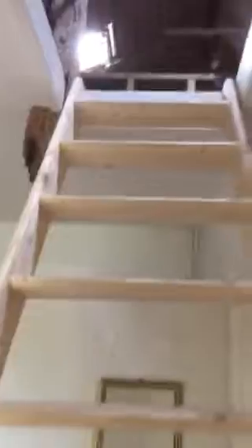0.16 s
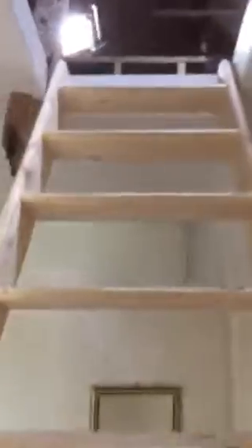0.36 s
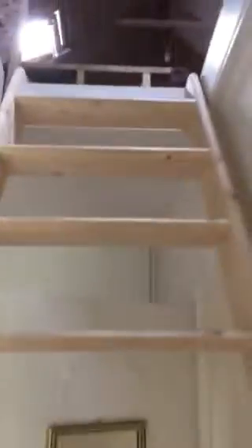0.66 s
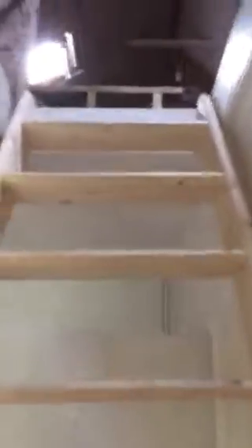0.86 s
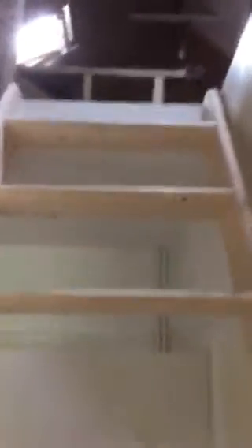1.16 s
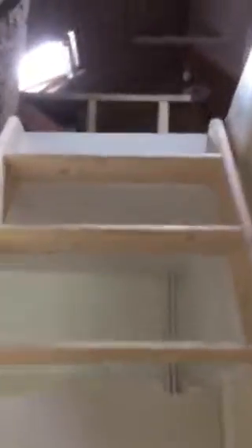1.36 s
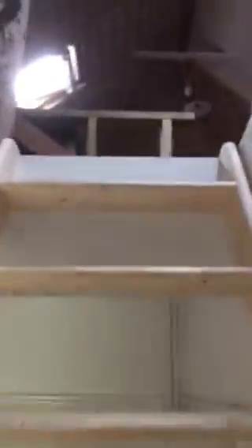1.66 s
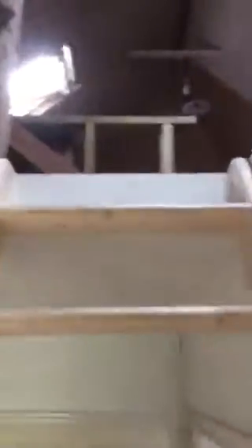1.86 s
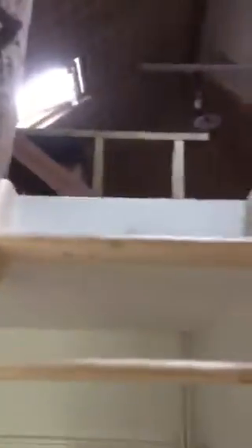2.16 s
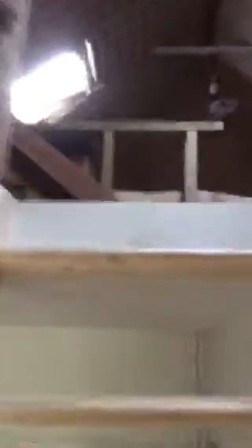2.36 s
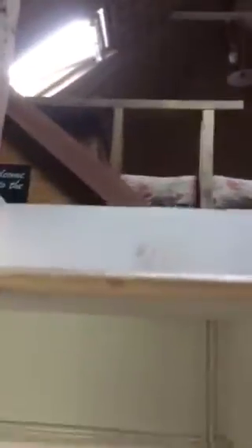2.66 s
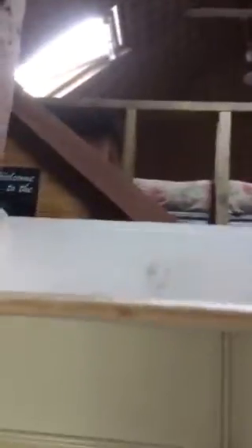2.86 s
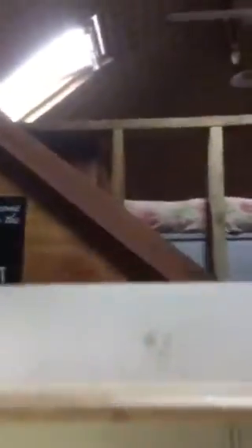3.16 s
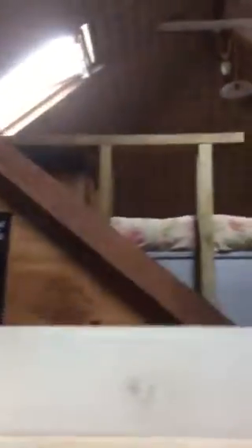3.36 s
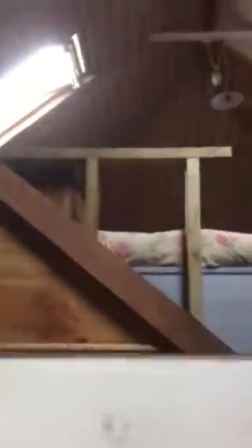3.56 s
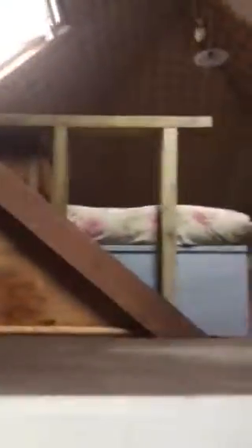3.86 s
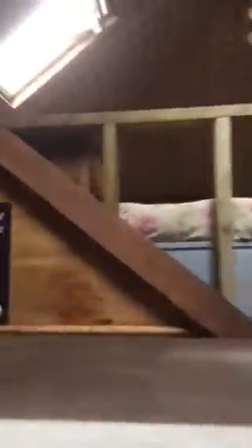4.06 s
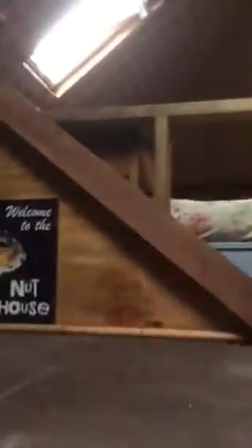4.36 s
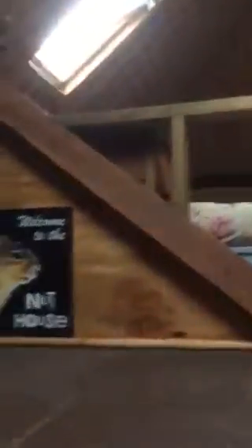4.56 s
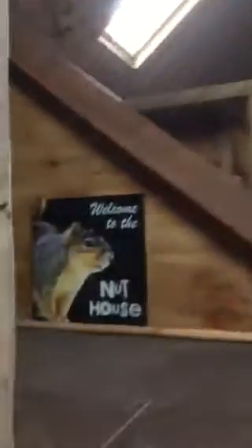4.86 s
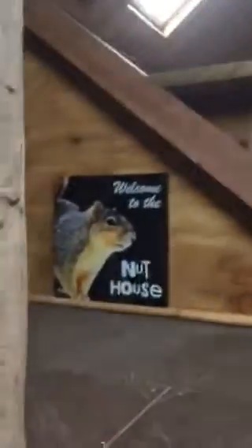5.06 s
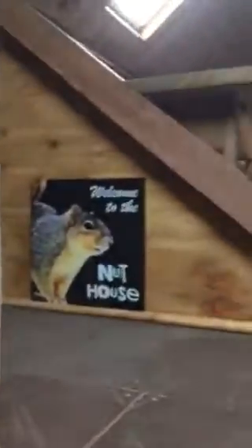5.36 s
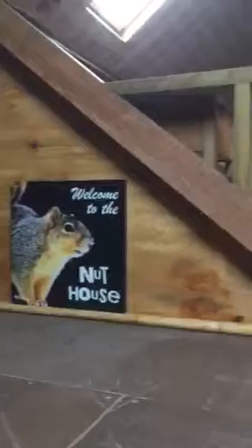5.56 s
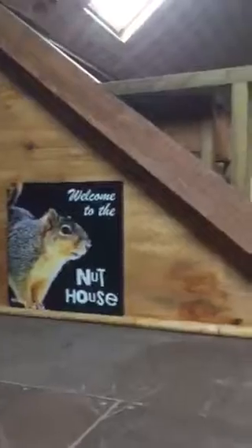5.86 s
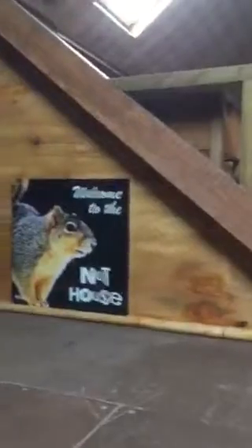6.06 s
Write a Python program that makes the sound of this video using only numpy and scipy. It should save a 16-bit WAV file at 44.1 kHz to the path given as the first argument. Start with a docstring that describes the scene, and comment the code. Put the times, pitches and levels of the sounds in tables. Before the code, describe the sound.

In a small, bare, quiet room, one person climbs a steep wooden stair, a footfall about every three quarters of a second. Each lands with a low hollow thump, woody knock and soft slap, then a faint scuff as the other foot leaves. Sharp cracks cluster before the last steps onto attic boards, which are gentler. Cloth brushes and tiny squeaks fill the gaps. Single mono microphone, short room reverberation.

```python
"""Ladder-stair to the attic

Someone climbs a steep wooden ladder-stair onto attic boards in a small, bare, quiet room.
Footfalls graze, thump the frame (decaying low modes), knock the boards and slap (filtered noise bursts).
Wood cracks and landing feet tick (sharp noise bursts); push-offs thud and scuff, cloth brushes, grips squeak.
One mono microphone hears it all; distance is heard only as each sound's balance of direct and room."""
import sys
import numpy as np
from scipy import signal
from scipy.fft import rfft, irfft, next_fast_len
from scipy.io import wavfile
from scipy.ndimage import uniform_filter1d

SR = 44100
rng = np.random.default_rng(int(sys.argv[2]) if len(sys.argv) > 2 else 0)


def log_audio(samples):
    """Write samples as a 16-bit WAV file to the path given in sys.argv[1]."""
    # one column per channel
    frames = np.atleast_2d(samples).T
    # limit to full scale, then quantise
    limited = np.clip(frames, -1, 1)
    pcm = np.round(limited * 32767).astype(np.int16)
    wavfile.write(sys.argv[1], SR, pcm)


N = 273420
T = np.arange(3 * 2 ** 13) / SR  # the life of one sound [s]
HZ = np.fft.rfftfreq(len(T), 1 / SR) + 1e-3  # kept off zero so that ratios and logs exist

# Event levels are the rms of the loudest short stretch; a swell's half length is its bell's standard deviation.
# Steady room tone: (frequency [Hz], relative density [dB per Hz])
AIR = [(15, -63), (25, -16), (92, -3), (180, -3.5), (236, -8), (363, -11.5), (659, -17), (775, -17),
       (1230, -16.5), (1480, -19.5), (2110, -19.5), (13600, -30), (16000, -34.5)]
# Reverberation: (frequency [Hz], time to fall 60 dB [s])
ROOM = [(100, 0.47), (300, 0.43), (1000, 0.34), (3000, 0.32), (7000, 0.24), (15000, 0.43)]
# Footfalls: (time [s], thump level [dB], thump centre [Hz], ring length [factor], floor boom level [dB],
# knock level [dB], slap level [dB], slap upper edge [Hz])
STEPS = [(0.024, -26, 224, 0.81, -53, -32, -42, 5060), (0.798, -39, 244, 1.46, -45, -43, -52, 3430),
         (1.548, -38, 160, 1.87, -42, -45.5, -45.5, 2750), (2.232, -39, 314, 0.5, -52, -44, -44.5, 3720),
         (2.254, -26, 110, 1.02, -53, -39, -41, 2970), (2.921, -33.5, 179, 1.32, -45, -39.5, -45.5, 2580),
         (3.593, -30.5, 190, 1.8, -66, -37.5, -40.5, 3140),
         (4.371, -34, 282, 0.58, -44.5, -44, -48.5, 3250), (5.122, -45, 218, 1.2, -51.5, -53, -60, 2230)]
# Sharp cracks of wood, and bright ticks of the feet as they land: (time [s], level [dB], centre [Hz])
SNAPS = [(0.022, -52.5, 4600), (0.311, -59, 2840), (0.804, -52.5, 3400), (0.854, -55.5, 5650),
         (0.902, -48, 3920), (0.9435, -56, 2230), (1.549, -53.5, 5500), (2.252, -39.5, 4140),
         (2.33, -61.5, 9000), (2.922, -59, 6500), (2.972, -50, 3000), (3.679, -56.5, 4070),
         (3.8092, -41.5, 2440), (3.838, -47, 3100), (3.879, -40.5, 2520), (5.987, -48, 3730),
         (6.008, -69, 2230)]
# Low modes of the stair frame and the floor that carries it:
# (frequency [Hz], relative level [dB], time to fall 60 dB before the ring factor [s])
FRAME = [(45.9, -12, 0.92), (62.2, -3.5, 0.64), (85.5, -4, 0.44), (120.9, 0.5, 0.3), (148.4, -2.5, 0.36),
         (173.1, -7, 0.31), (201.9, 1.5, 0.21), (249, -3, 0.3), (268.9, 0, 0.17), (304, 1.5, 0.11),
         (351.3, -10, 0.27)]
# Resonances of a single board: (frequency [Hz], width [Hz], relative level [dB])
BOARD = [(414, 55, 7.5), (596.7, 44, -1.5), (663, 10, 0.5), (828, 51, -4), (917, 26, 1), (1110, 100, -1),
         (1275, 130, -4.5), (1340, 34, -19.5), (1842, 330, -3.5), (2088, 27, -1.5), (2456, 170, -1),
         (3150, 41, -6), (3630, 23, -4), (4160, 17, -36)]
# Push-offs of the trailing foot:
# (time [s], thud level [dB], knock level [dB], scuff level [dB], scuff centre [Hz])
PUSH_OFFS = [(.368, -54, -68, -59.5, 1010), (.945, -51, -45, -72, 2370), (1.07, -57, -67.5, -60, 3520),
             (1.808, -49, -70, -58, 1610), (2.445, -60.5, -66.5, -59.5, 3040),
             (3.113, -54, -65, -64.5, 3300), (4.522, -55.5, -65, -69, 2070), (5.264, -61, -74, -100, 1520),
             (5.918, -59.5, -71, -71, 1620)]
# Broad brushes over wood: mostly cloth as a leg swings, and at 1.663 s a sole sliding on its tread: (time of
# peak [s], half length [s], level [dB])
SWINGS = [(1.189, 0.018, -57), (1.293, 0.058, -64.5), (1.663, .029, -59), (2.6, 0.033, -55.5),
          (2.881, 0.041, -67.5), (4.099, .035, -55.5), (5.986, 0.015, -57.5)]
# Rubbing squeaks: (time of peak [s], half length [s], level [dB], pitch at peak [Hz], glide [octaves/s])
SQUEAKS = [(1.269, .0045, -60, 2900, -5.5), (1.371, .008, -65.5, 2414, -2), (2.71, .011, -58, 2540, 2),
           (3.102, 0.028, -60.5, 1777, 1.5), (4.196, 0.012, -61, 1243, -8.5), (4.72, 0.031, -78, 1454, 0),
           (4.98, .095, -81, 1247, .5)]
# Resonances of an attic floor panel: (frequency [Hz], width [Hz], relative level [dB])
PANEL = [(496, 110, 6.5), (834, 90, -14), (990, 100, 0), (1310, 110, -0.5), (1730, 85, -25), (2840, 250, 4),
         (3340, 130, 5.5)]


def amp(db):
    """Decibels to gain."""
    return 10 ** (np.asarray(db) / 20)


def along(points, hz):
    """(Hz, value) points read on a log frequency axis."""
    f, v = np.transpose(points)
    return np.interp(np.log(hz + 1), np.log(f), v)


def room_tone():
    """Faint steady rumble and hiss: noise with the spectrum of the still room."""
    level_db = -70
    spectrum = rfft(rng.standard_normal(N))
    colour = amp(along(AIR, np.fft.rfftfreq(N, 1 / SR)))
    air = irfft(spectrum * colour, N)
    return amp(level_db) * air / np.std(air)


def loudest(x, size):
    """Scale x to rms 1 over its loudest stretch of size samples."""
    power = uniform_filter1d(x * x, size, mode="constant")
    return x / np.sqrt(np.max(power))


def add(track, s, x):
    """Mix x into the track from time s."""
    start = max(round(s * SR), 0)
    track[start:start + len(x)] += x[:N - start]


def band(low_hz, high_hz, fall=5.1):
    """Gain of a pass band with soft edges; fall sets the steepness of the upper one."""
    below = 1 + (low_hz / HZ) ** 6
    above = 1 + (HZ / high_hz) ** (2 * fall)
    return 1 / np.sqrt(below * above)


def favour(hz, centre_hz, octaves):
    """The place of a blow brings out the resonances around one pitch."""
    return 1 / np.sqrt(1 + (2 * np.log2(hz / centre_hz) / octaves) ** 2)


def resonances(modes):
    """Power gain of a wooden part, summed over its resonant peaks."""
    return sum(amp(db) ** 2 / (1 + ((HZ ** 2 - hz ** 2) / (HZ * width)) ** 2) for hz, width, db in modes)


def board(between_db):
    """Gain of a board's resonances, over the many weak modes between them."""
    return np.sqrt(resonances(BOARD) + amp(between_db) ** 2)


def coloured(x, gain):
    """Causal (minimum-phase) filter with the given gain, so that nothing sounds before a blow."""
    cepstrum = irfft(np.log(np.maximum(gain, 1e-5)))
    # fold the cepstrum onto positive time
    cepstrum[1:] *= 2 * (np.arange(1, len(T)) < len(T) // 2)
    response = irfft(np.exp(rfft(cepstrum)))
    return signal.fftconvolve(x, response)[:len(T)]


def room_tail():
    """The room's diffuse answer, drawn anew for each sound; it dies soonest around 7 kHz."""
    hz, t, z = signal.stft(rng.standard_normal(len(T)), SR, nperseg=256)
    decay = amp(-60 * t / along(ROOM, hz)[:, None])
    tail = signal.istft(z * decay, SR, nperseg=256)[1]
    return tail[:len(T)] / np.linalg.norm(tail)


def in_room(x, wet_db):
    """A sound together with its reverberation."""
    return x + amp(wet_db) * signal.fftconvolve(x, room_tail())[:len(T)]


def burst(t60, rise, wet_db):
    """The brief rough contact of two surfaces, and the reflections that build up after it."""
    contact = rng.standard_normal(len(T)) * amp(-60 * T / t60) * (1 - np.exp(-T / rise))
    reflections = room_tail() * (1 - np.exp(-T / 0.00055))
    return contact / np.linalg.norm(contact) + amp(wet_db) * reflections


def swell(half):
    """A bell-shaped rise and fall that peaks three half lengths after its start."""
    return np.exp(-.5 * (T / half - 3) ** 2)


def stroke(half, gain):
    """Grainy friction that swells and fades."""
    grip_db = 4.5 * np.interp(T, T[::200], rng.standard_normal(len(T[::200])))
    rub = rng.standard_normal(len(T)) * amp(grip_db) * swell(half)
    return loudest(in_room(coloured(rub, gain), wet_db=-1.5), size=1024)


def brush(s, half, db, low_hz, high_hz):
    """A track with one stroke of sole or cloth over wood, peaking at time s."""
    track = np.zeros(N)
    colour = board(between_db=1) * band(low_hz, high_hz, fall=2.06) / np.sqrt(1 + HZ / 2000)
    add(track, s - 3 * half, amp(db) * stroke(half, colour))
    return track


def footsteps():
    """Each foot grazes and lands with thump, boom, knock and slap; then it rolls onto its ball
    and, on a tread, slides."""
    attic_from_s = 4
    # time for the weight to come on; a duller landing is slower
    load_s, load_at_hz, load_power = 0.0071, 3040, 1.9
    # the sole grazes as it lands, its level taken over the slap
    touch_half_s, touch_db, touch_low_hz, touch_high_hz = .005, -11.5, 329, 3600
    stair_knock_hz = 812  # where a tread rings most
    # after the heel, the foot rolls onto its ball; every tread takes the same body weight
    roll_s, roll_db, roll_hz, roll_rise_s, roll_knock_db = .046, -40, 132.6, 0.009, -54.5
    level_roll_db = -7.5  # on the level floor the roll is gentle: dB over the thump
    # the sole slides a little on the tread; a heavier landing slides louder
    slide_after_s, slide_half_s, slide_low_hz, slide_high_hz = 0.03, 0.019, 5200, 8000
    slide_at_db, slide_at_thump_db, slide_db_per_db = -62.5, -29, .5

    out = np.zeros(N)
    for s, db, centre_hz, ring, boom_db, knock_db, slap_db, edge_hz in STEPS:
        rise = load_s * (load_at_hz / edge_hz) ** load_power
        out += brush(s, touch_half_s, slap_db + touch_db, touch_low_hz, touch_high_hz)
        add(out, s, amp(db) * thump(centre_hz, rise, ring))
        add(out, s, amp(boom_db) * boom())
        add(out, s, amp(slap_db) * slap(edge_hz))
        if s < attic_from_s:
            add(out, s, amp(knock_db) * knock(stair_knock_hz))
            add(out, s + roll_s, settle(roll_db, roll_hz, roll_rise_s, roll_knock_db, stair_knock_hz))
            slide_db = slide_at_db + slide_db_per_db * (db - slide_at_thump_db)
            out += brush(s + slide_after_s, slide_half_s, slide_db, slide_low_hz, slide_high_hz)
        else:
            add(out, s, amp(knock_db) * panel(edge_hz))
            add(out, s + roll_s, amp(db + level_roll_db) * thump(roll_hz, roll_rise_s, ring=0.63))
    return out


def cracks_and_ticks():
    """Sharp cracks of wood, and bright ticks of the feet as they land; lower snaps shake the wood more."""
    spread = 2.82  # band edges as a factor either side of the centre
    top_hz = 13800  # the top of the snaps is softened on the way to the microphone
    # room share of a snap at the reference level; it hardly varies, fainter ones being a touch drier
    room_db, snap_at_db, room_db_per_faint_db = -2.5, -43.5, -0.01
    # a low snap shakes board and frame too; a high one does so less
    shake_at_hz, shake_db_per_octave = 2540, -9
    shake_knock_db, shake_knock_hz, shake_thump_db, shake_thump_hz = -4, 1126, -6, 226

    out = np.zeros(N)
    wood = board(between_db=-7.0) * band(300, top_hz, fall=5.4) / np.sqrt(1 + HZ / 1500)
    for s, db, centre_hz in SNAPS:
        wet_db = room_db + room_db_per_faint_db * (snap_at_db - db)
        noise = burst(t60=0.024, rise=0.0019, wet_db=wet_db)
        snap = coloured(noise, wood * band(centre_hz / spread, centre_hz * spread, fall=2.45))
        shake_db = db + shake_db_per_octave * np.log2(centre_hz / shake_at_hz)
        shake = settle(shake_db + shake_thump_db, shake_thump_hz, 0.0036,
                       shake_db + shake_knock_db, shake_knock_hz)
        add(out, s, amp(db) * loudest(snap, size=1024) + shake)
    return out


def thump(centre_hz, rise, ring):
    """Weight comes on and bends the frame, which rings in its low modes."""
    hz, db, t60 = np.transpose(FRAME)[:, :, None]
    strength, detune = rng.standard_normal((2, len(FRAME), 1))
    sizes = favour(hz, centre_hz, octaves=0.6) * amp(db + 2.6 * strength)
    cycles = hz * (1 + 0.0088 * detune) * T + rng.random((len(FRAME), 1))
    decay = np.exp(-np.log(1000) * T / (t60 * ring))
    modes = sizes * np.sin(2 * np.pi * cycles) * decay
    loaded = modes.sum(0) * (1 - np.exp(-T / rise))
    return loudest(in_room(loaded, wet_db=-6.5), size=2048)


def knock(centre_hz):
    """A blow rings the board's short, woody resonances; the low ones belong to the frame."""
    gain = board(between_db=-6) * favour(HZ, centre_hz, octaves=0.47) * band(low_hz=336, high_hz=1630)
    blow = coloured(burst(t60=0.026, rise=0.00074, wet_db=-17.5), gain)
    return loudest(in_room(blow, wet_db=2.0), size=1024)


def settle(thud_db, centre_hz, rise, knock_db, knock_hz):
    """A shift of weight: a short thud of the frame and a knock of the board."""
    return amp(thud_db) * thump(centre_hz, rise, ring=0.83) + amp(knock_db) * knock(knock_hz)


def boom():
    """The heavy floor follows slowly with a dull, deep swing."""
    push = burst(t60=0.2, rise=0.016, wet_db=-2)
    return loudest(coloured(push, band(74, 78.6, fall=3.5)), size=2048)


def slap(edge_hz):
    """The sole meets the surface; a duller landing sounds in a lower band."""
    gain = board(between_db=-1) * band(0.36 * edge_hz, edge_hz, fall=5.45)
    return loudest(coloured(burst(t60=0.048, rise=0.00038, wet_db=7.0), gain), size=1024)


def push_offs():
    """The trailing foot unloads its board and scuffs it as it leaves."""
    thud_hz, rise_s, knock_hz = 185.5, 0.0064, 960
    scuff_after_s, scuff_half_s = .014, 0.031
    spread = 2.84  # band edges as a factor either side of the centre
    out = np.zeros(N)
    for s, thud_db, knock_db, scuff_db, scuff_hz in PUSH_OFFS:
        add(out, s, settle(thud_db, thud_hz, rise_s, knock_db, knock_hz))
        out += brush(s + scuff_after_s, scuff_half_s, scuff_db, scuff_hz / spread, scuff_hz * spread)
    return out


def leg_swings():
    """Broad brushing of cloth as a leg swings, and once of a sole sliding on its tread."""
    return sum(brush(s, half, db, low_hz=1300, high_hz=4670) for s, half, db in SWINGS)


def squeaks():
    """Narrow squeaks where a surface grips; louder and higher ones are rougher."""
    # relative pitch jitter of a squeak at the reference level and pitch
    jitter_at, jitter_at_db, jitter_at_hz = 0.134, -61, 2000
    out = np.zeros(N)
    for s, half, db, hz, glide in SQUEAKS:
        jitter = jitter_at * amp(db - jitter_at_db) * (hz / jitter_at_hz) ** 2.15
        add(out, s - 3 * half, amp(db) * squeak(half, hz, glide, jitter))
    return out


def squeak(half, hz, glide, jitter):
    """Stick and slip at an unsteady, gliding rate."""
    waver = np.interp(T, T[::24], rng.standard_normal(len(T[::24])))
    pitch = hz * 2 ** (glide * (T - 3 * half)) * (1 + jitter * waver)
    tone = swell(half) * np.sin(2 * np.pi * np.cumsum(pitch) / SR)
    return loudest(in_room(tone, wet_db=-4.5), size=1024)


def panel(edge_hz):
    """A foot rings a thin floor panel; a duller landing brings out its lower resonances."""
    centre_hz = 0.39 * edge_hz  # rings most at this share of the slap edge
    gain = np.sqrt(resonances(PANEL)) * favour(HZ, centre_hz, octaves=0.46)
    gain = gain * band(low_hz=377, high_hz=edge_hz, fall=5.7)
    blow = coloured(burst(t60=0.092, rise=0.0021, wet_db=-9), gain)
    return loudest(in_room(blow, wet_db=-6.5), size=1024)


def scene():
    """Everything as it reaches the one microphone."""
    mix = room_tone() + footsteps() + cracks_and_ticks() + push_offs() + leg_swings() + squeaks()
    return mix[None]


def record(dry):
    """The recorder keeps nothing above its band limit."""
    top_hz = 15900
    size = next_fast_len(N + SR)
    kept = np.fft.rfftfreq(size, 1 / SR) < top_hz
    return irfft(rfft(dry, size) * kept, size)[:, :N]


dry = scene()
out = record(dry)
log_audio(out)
```